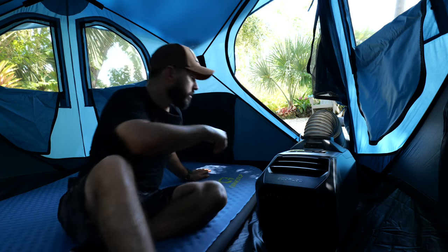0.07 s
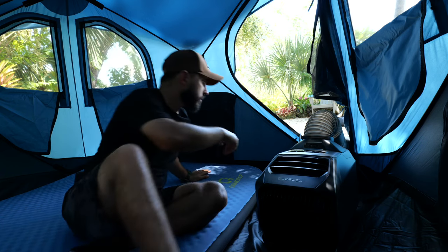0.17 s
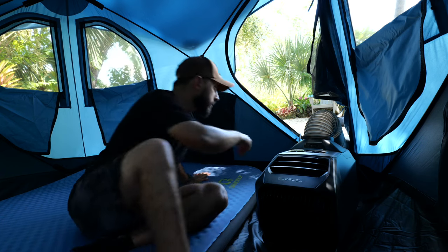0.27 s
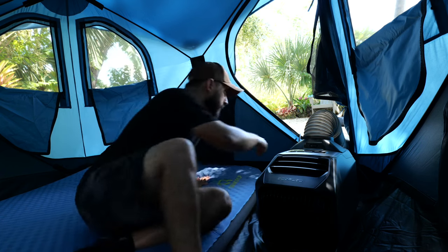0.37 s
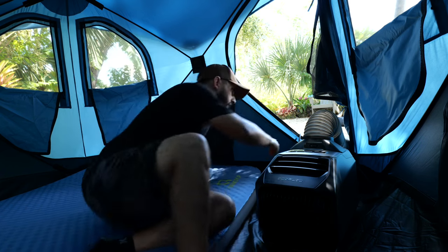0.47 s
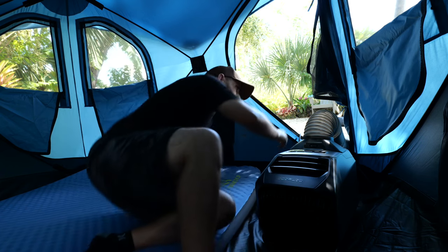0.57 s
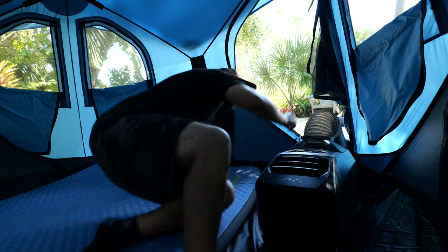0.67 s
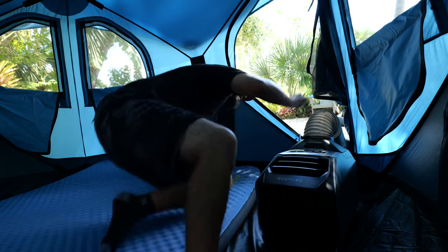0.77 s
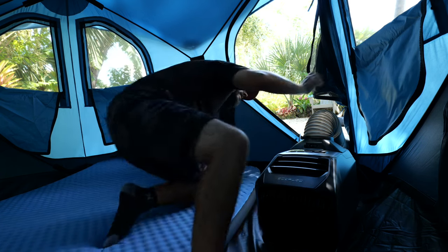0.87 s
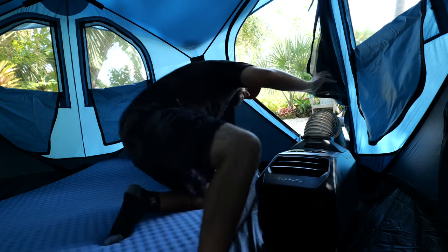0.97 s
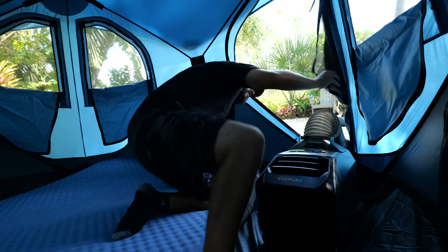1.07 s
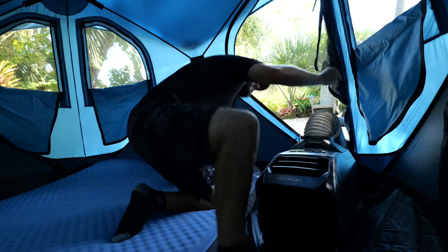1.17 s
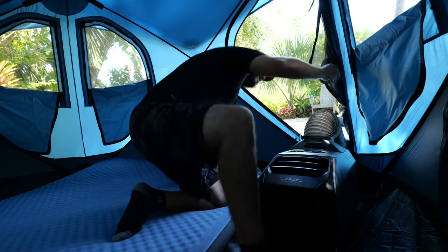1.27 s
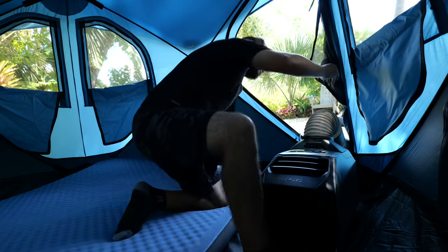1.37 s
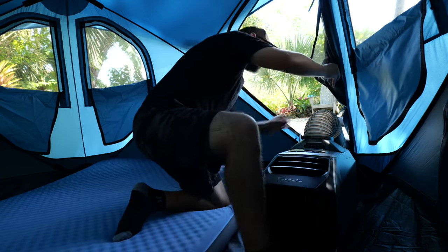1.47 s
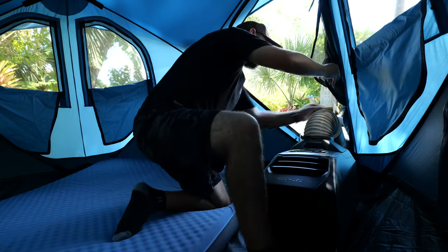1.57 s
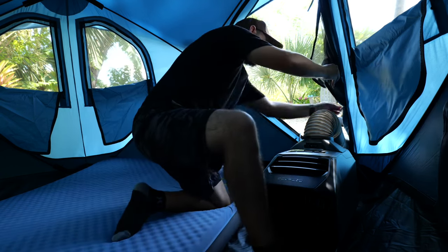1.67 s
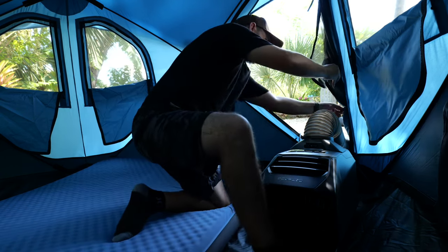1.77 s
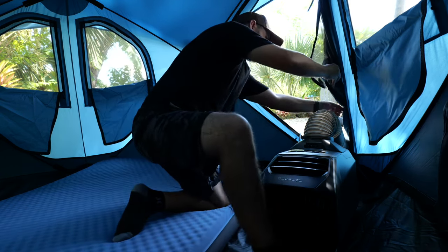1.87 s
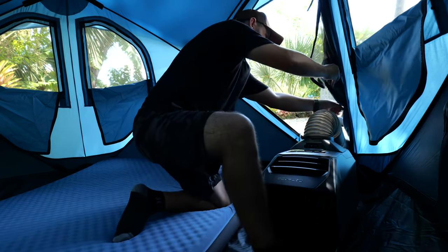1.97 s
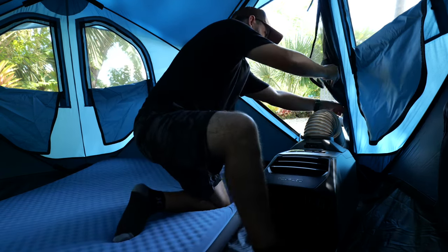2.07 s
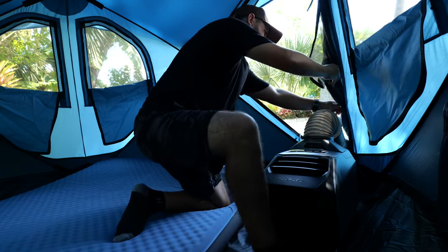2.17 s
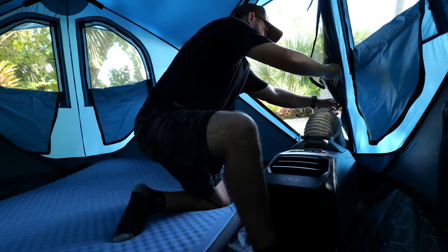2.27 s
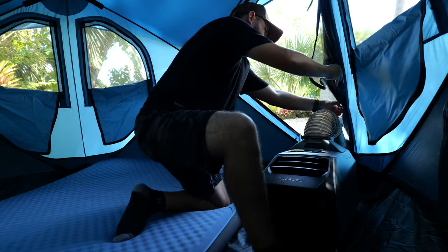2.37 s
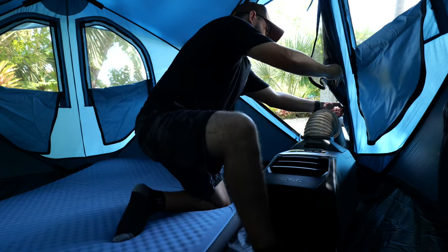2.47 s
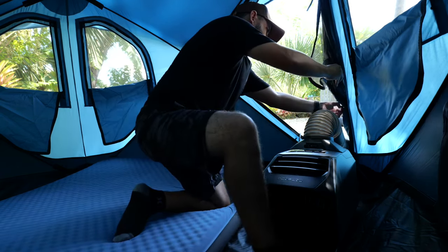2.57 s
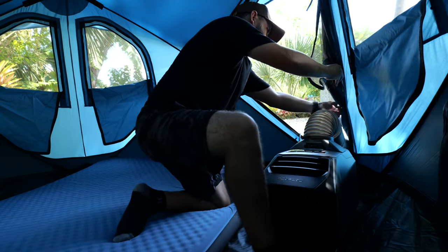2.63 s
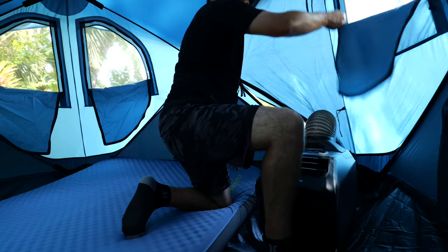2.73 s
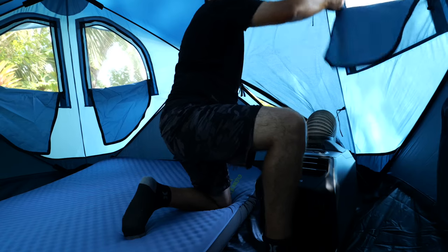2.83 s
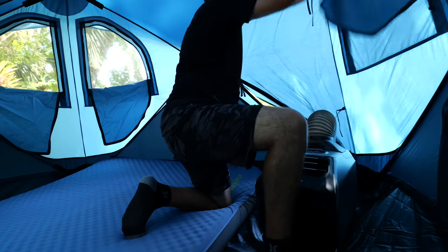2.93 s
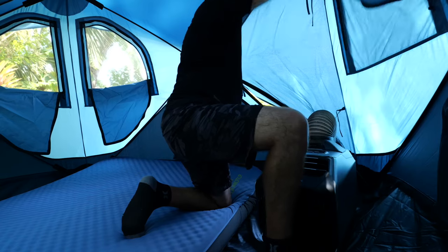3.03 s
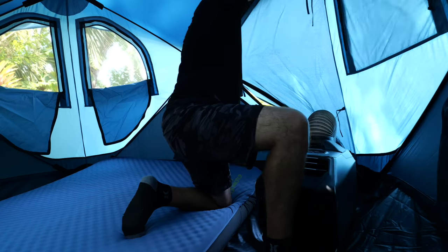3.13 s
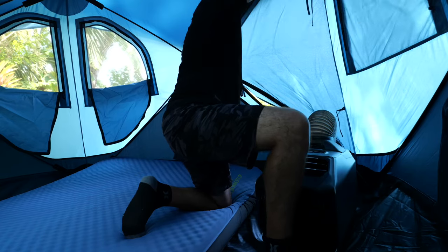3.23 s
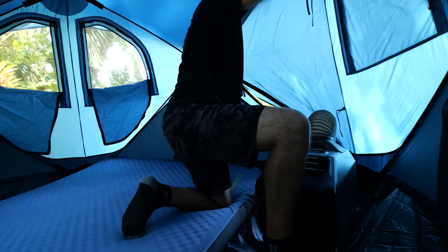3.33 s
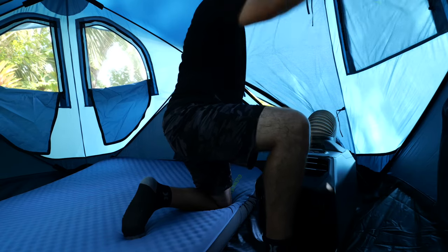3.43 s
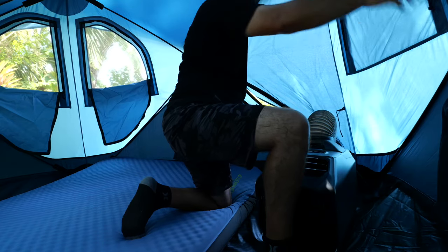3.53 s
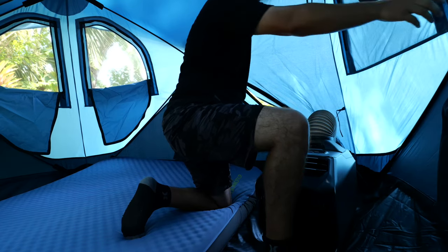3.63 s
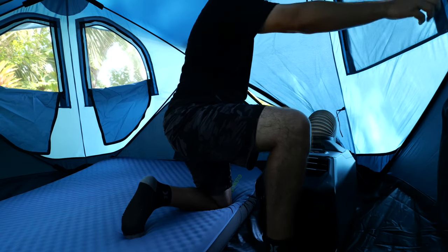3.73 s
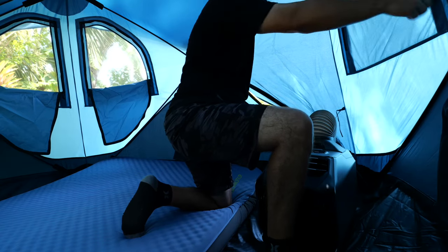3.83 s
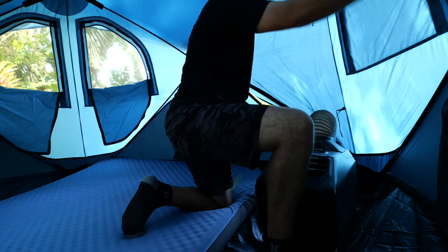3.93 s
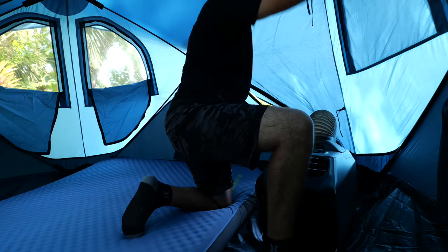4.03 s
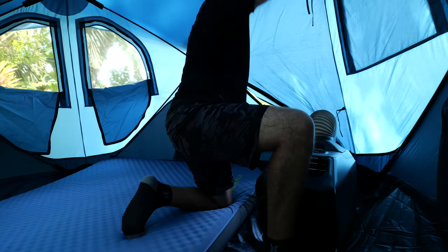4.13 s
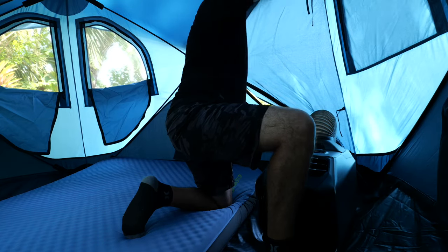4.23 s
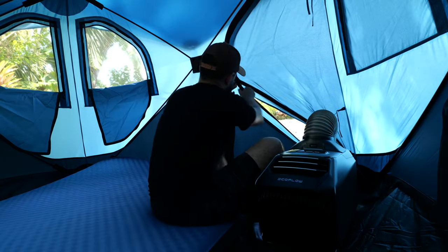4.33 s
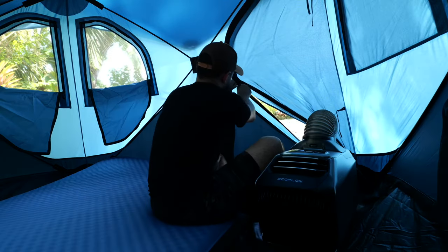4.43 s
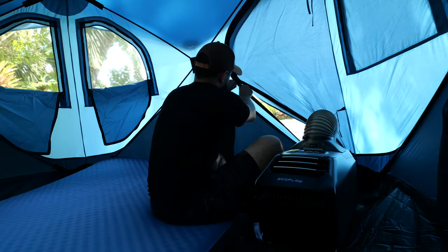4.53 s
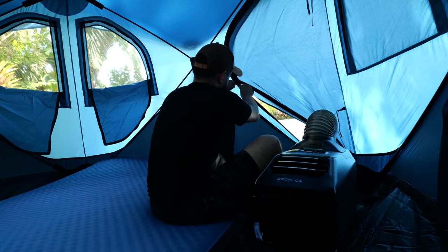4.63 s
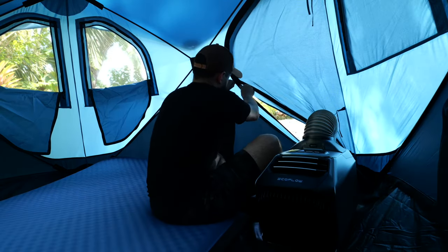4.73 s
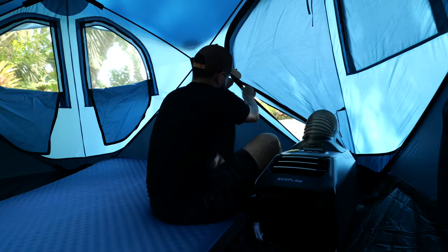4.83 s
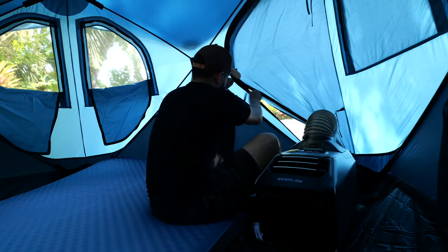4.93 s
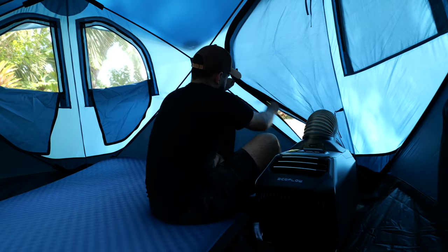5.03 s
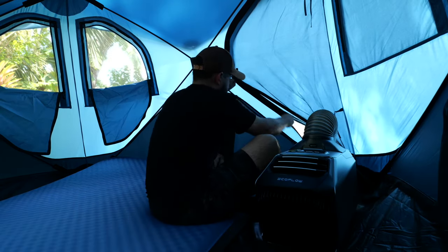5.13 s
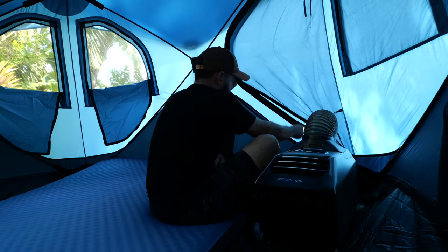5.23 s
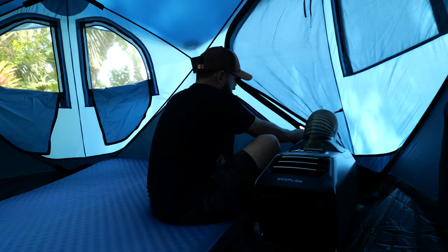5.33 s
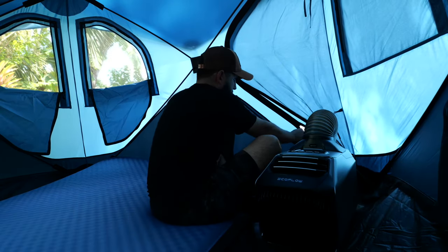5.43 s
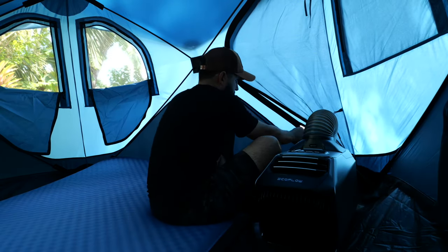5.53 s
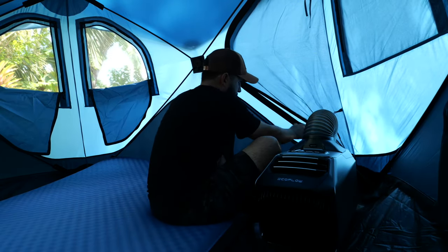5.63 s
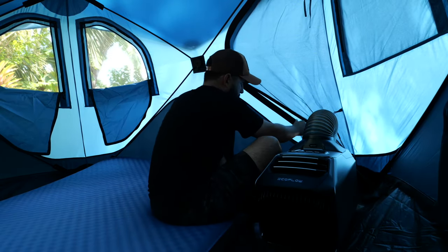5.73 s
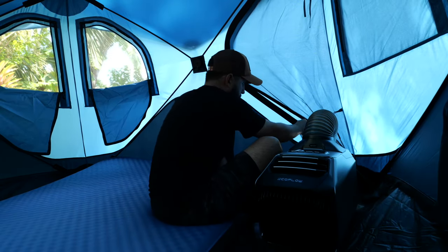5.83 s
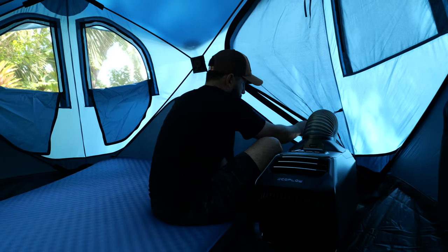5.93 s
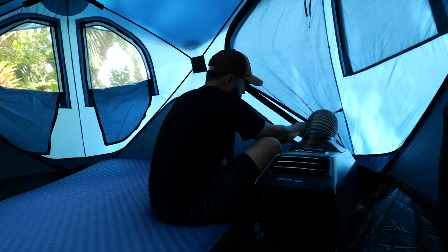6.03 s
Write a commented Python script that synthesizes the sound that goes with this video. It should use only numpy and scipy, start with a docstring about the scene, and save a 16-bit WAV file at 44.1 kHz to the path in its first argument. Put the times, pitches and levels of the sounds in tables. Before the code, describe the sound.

Inside a small nylon tent, clothes brush a foam mat and stiff fabric is grabbed with crisp crackles and sharp snaps. A short zip whirs upward in pitch, slack cloth flaps softly, and a second, higher zip buzzes past. After a tab jingle and fabric pops, a third zip clicks, rises, and falls. Crumpling follows. The microphone is close and dry, slightly overloaded on peaks.

```python
"""Zipping up a nylon tent

Inside a nylon tent someone shifts on a foam mat, lifts the window flaps and pulls three zippers shut.
Each slider clicks over the teeth when slow and sings at their rate when fast: gliding tones, rasp and hiss.
Filtered noise makes the cloth swish and crumple, short swings make it snap, decaying modes ring the pull tab.
One close microphone, which the loudest peaks overload, also hears faint air outside."""
import sys
import numpy as np
from scipy import signal
from scipy.fft import rfft, irfft, next_fast_len
from scipy.io import wavfile
from scipy.ndimage import uniform_filter1d, map_coordinates

SR = 44100
rng = np.random.default_rng(int(sys.argv[2]) if len(sys.argv) > 2 else 0)


def generate_wav(sig):
    """Save sig (samples, or channels by samples) to the path in sys.argv[1] as 16-bit PCM at SR."""
    pcm = np.round(np.clip(np.atleast_2d(sig).T, -1, 1) * 32767).astype(np.int16)
    wavfile.write(sys.argv[1], SR, pcm)


N = 268965
TIME = np.arange(N) / SR

# Slider strokes. Each row: time in seconds, teeth per second, effort in dB.
FLAP_UP = [(2.712, 453, -17.5), (2.754, 584, -6.5), (2.788, 485, -14.5), (2.812, 453, -12.5),
           (2.86, 463.7, -14.5), (2.896, 620, -6.5), (2.926, 714, -15.5), (2.948, 740.1, -11),
           (2.992, 968.8, -23), (3.054, 724.9, -17), (3.074, 571.8, -17)]
FLAP_ACROSS = [(3.892, 599, -10), (3.904, 659.7, -13), (3.93, 647, -10.5), (3.954, 742.9, -9),
               (3.992, 941, -19), (4.03, 995.6, -23), (4.072, 874.6, -16), (4.136, 1078, -16),
               (4.188, 949, -8), (4.208, 874, -18), (4.23, 958, -8), (4.264, 782, -8.5), (4.29, 638, -21)]
WINDOW_DOWN = [(4.83, 60.3, -8), (4.856, 86.2, -14), (4.94, 201.4, -8.5), (4.97, 334.7, -17),
               (5.004, 496.9, -13), (5.044, 655.5, -9), (5.074, 670.4, -16), (5.122, 559.5, -11),
               (5.176, 413.2, -16), (5.238, 452.4, -7.5), (5.27, 345.7, -15), (5.298, 251.4, -18),
               (5.335, 131.3, -23)]
# Wall and tighter-stretched roof panel shaken by the teeth. Each row: frequency in Hz, relative gain in dB.
WALL = [(40, -11.5), (130, -3), (300, 1), (450, 1), (800, 7), (1250, 5.5), (1700, -3.5), (2400, -11),
        (3000, -48), (6000, -104)]
ROOF = [(40, 1.5), (110, -19), (200, -9.5), (450, -11), (780, 3), (950, -5.5), (1250, 0.5), (1700, -10),
        (2400, -14.5), (3000, -37), (6000, -48)]
# Slider hiss, screened by cloth or in the open. Each row: frequency in Hz, relative gain in dB.
SCREENED = [(1500, -60), (2600, -5), (4500, 1), (5600, -13.5), (8000, -13.5), (11000, -26), (16000, -41)]
OPEN = [(1500, -54), (2600, -1.5), (4000, 2.5), (5000, -4), (7000, -1), (10000, -7.5), (12500, -14.5),
        (16000, -22)]
# How strongly the taut nylon sings. Each row: pitch in Hz, relative level in dB.
SINGING = [(60, -11), (130, 7), (200, 2), (300, -10), (420, -8.5), (600, -2.5), (900, -0.5), (1300, -2.5),
           (2000, -10)]
ZIP_ATTACK_S, ZIP_RELEASE_S = 0.0094, 0.0048
ODD_LOSS_DB = 3  # teeth come from the two rows in turn, which weakens the odd overtones
STEADYING = 1  # dB less roughness per dB of effort


def zipper(stroke, panel, hiss_colour, waver, rough, jerk_db, note_db, note_grows, octave_db,
           overtone_db, fall_db, rasp_db, rasp_grows, hiss_db, hiss_per_octave_db, hiss_db_per_s, puff_s):
    """The slider bumps over the teeth: a gliding note, a rasp of unequal teeth, a puff of hiss per tooth."""
    teeth, effort_db = curves(stroke)
    gate = envelope(stroke[0][0] + ZIP_ATTACK_S, stroke[-1][0], ZIP_ATTACK_S, ZIP_RELEASE_S)
    # effort brings out the note far more than the rasp
    push_db = effort_db - np.average(effort_db, weights=gate)
    # the hiss follows the speed and drifts along the stroke
    from_middle = np.clip(TIME - np.average(TIME, weights=gate), -.5, .5)
    speed_db = hiss_per_octave_db * np.log2(teeth / teeth.max())
    scrape_db = hiss_db + speed_db + hiss_db_per_s * from_middle
    turns = np.cumsum(teeth * (1 + waver * wobble(150))) / SR  # teeth passed so far
    # a firm pull runs evenly, a weak one stumbles
    uneven = rough * amp(-STEADYING * push_db)

    def jerks():
        return unit(amp(jerk_db * wobble(50)))

    # fundamental and octave trade strength as they glide through the resonances of the nylon
    first = amp(along(SINGING, teeth))
    octave = amp(along(SINGING, 2 * teeth) + octave_db)
    pair = first * jerks() * ragged(turns, uneven, 260)
    pair += octave * jerks() * ragged(2 * turns, 2 * uneven, 260)
    note = amp(note_db + note_grows * push_db) * pair / np.hypot(first, octave)

    # the high overtones follow the scrape and blur as they rise
    for k in range(3, 7):
        level_db = scrape_db + overtone_db - fall_db * (k - 5) - ODD_LOSS_DB * (k % 2)
        note += amp(level_db) * jerks() * ragged(k * turns, 1.36 * k * rough, 75 * k)

    # each tooth kicks the panel with its own strength, over a bed of irregular catches and friction
    tooth = np.diff(np.floor(turns), prepend=0) * np.sqrt(SR / teeth)
    strengths = 0.26 * rng.standard_normal(N) + 0.45 * wobble(300)
    kicks = tooth * strengths + .5 * grains(260, 1.9, 0.66)
    rasp = unit(colour(kicks, panel))

    # a puff has a fixed life: separate ticks when slow, one hiss when fast
    lives = 1 / (teeth * puff_s)
    even_power = np.sqrt(2 * lives / (1 - np.exp(-2 * lives)))
    puffs = np.exp(-lives * (turns % 1)) * even_power * amp(0.87 * wobble(160))
    friction = colour(puffs * grains(3000, 3.9, 0.06), hiss_colour)
    hiss = unit(patchy(friction, depth_db=3.5))
    return gate * (note + amp(rasp_db + rasp_grows * push_db) * rasp + amp(scrape_db) * hiss)


# The click of a single tooth. Each row: frequency in Hz, relative gain in dB.
CLICK = [(120, -23), (500, 19), (1100, -1.5), (2000, -27.5), (4000, -2), (9000, -25), (15000, -31)]


def slow_teeth(stroke, click_db, merge_hz, click_s):
    """While the slider creeps, each tooth catches and lets go with a click; at speed they merge and vanish."""
    teeth, effort_db = curves(stroke)
    moving = (TIME >= stroke[0][0]) & (TIME <= stroke[-1][0])
    turns = np.cumsum(teeth * moving) / SR
    since_tooth = (turns % 1) / teeth  # seconds
    clicks = np.exp(-since_tooth / click_s) * amp(3.0 * wobble(120)) * moving
    level = amp(effort_db + click_db) / (1 + (teeth / merge_hz) ** 4)
    return level * clicks * unit(colour(rng.standard_normal(N), CLICK))


# Heaving panels, then crumpling creases. Each row: frequency in Hz, relative gain in dB.
HEAVE = [(15, -44), (25, -24), (108, 3.5), (204, 0.5), (300, -6.5), (390, -23), (660, -120)]
CRUMPLE = [(120, -29.5), (200, -10), (418, 1), (459, -1.5), (578, 2.5), (726, -3), (1120, -4), (1950, -16),
           (2400, -16.5), (3120, -35.5), (5280, -120)]
# Swish of clothes on the mat, a gripped flap, a dragged hem, and the wall or slack cloth.
# Each row: frequency in Hz, relative gain in dB.
CLOTHES = [(1000, -13), (1700, -5.5), (2150, -9.5), (2720, -2), (2820, 0), (7210, -3.5), (13900, -20.5),
           (16000, -27)]
GRIP = [(470, -30), (800, 4.5), (873, -3.5), (1240, 1.5), (2000, -4), (3300, -1), (4930, -7.5),
        (12600, -24), (14800, -28), (16000, -56)]
HEM = [(1000, -33.5), (1700, -9.5), (1960, -9.5), (2130, 1.5), (2570, -0.5), (3100, -1.5), (3840, -4),
       (5600, -1), (7010, -7.5), (9920, -13), (14700, -25.5), (16000, -27)]
SWISH = [(820, -44), (1400, -2.5), (1810, -1.5), (2630, 2.5), (3650, 0), (7530, -7.5), (12900, -19.5),
         (15200, -25), (16000, -50)]


def cloth(name, weave_colour, crease_rate, crease_share, crisp_share, bright_db, sub_db, uneven_db):
    """Moving nylon: whole panels heave, creases buckle, and the weave swishes over itself."""
    heaving, crumpling, swishing = motion(name)
    rumble = colour(rng.standard_normal(N), HEAVE)
    heave = unit(colour(rumble, [(35, sub_db), (130, 0)]))
    creases = grains(crease_rate, 4.5, crease_share)
    crumple = unit(colour(creases, CRUMPLE))
    rubbing = grains(900, 0.76, crisp_share) + 0.53 * creases
    weave = patchy(colour(rubbing, weave_colour), depth_db=2.5)
    swish = unit(colour(weave, [(2500, 0), (14000, bright_db)]))
    grip = amp(1.2 * wobble(70) + uneven_db * wobble(22))
    return grip * (heaving * heave + crumpling * crumple + swishing * swish)


# Pushes and pulls on the cloth. Each row: start in seconds, length in seconds, which cloth,
# heave level in dB, crumple level in dB, swish level in dB.
MOVES = [(0.057, 0.043, "clothes", -58, -63, -40), (0.1, 0.12, "clothes", -48, -62, -49),
         (0.288, 0.026, "clothes", -28.5, -25.5, -32), (0.364, .32, "clothes", -34, -29.5, -36.5),
         (0.678, 0.22, "clothes", -41.5, -41, -30), (0.921, 0.038, "clothes", -30, -28, -36),
         (1.015, 0.027, "grip", -37, -31.5, -26), (1.067, 0.05, "grip", -42, -29, -20),
         (1.176, 0.1, "grip", -37, -26, -23.5), (1.348, 0.051, "grip", -42, -37, -31),
         (1.44, 0.21, "grip", -40.5, -46, -39.5), (1.591, 0.66, "hem", -38, -32, -32.5),
         (2.24, .03, "hem", -34, -27, -30), (2.344, 0.21, "hem", -35.5, -31, -31),
         (2.635, 0.0083, "hem", -36, -25.5, -25), (2.919, 0.27, "slack", -27.5, -33.5, -49.5),
         (3.262, 0.68, "slack", -29.5, -41, -59), (3.468, 0.096, "slack", -19.5, -28, -52),
         (3.646, 0.17, "slack", -28.5, -35.5, -53), (3.916, 0.35, "slack", -30.5, -48, -64),
         (4.358, 0.32, "wall", -33.5, -32.5, -35), (4.424, 0.066, "wall", -50, -28, -29),
         (4.769, .03, "wall", -21.5, -33, -33), (5.347, 0.73, "wall", -31.5, -35.5, -37.5),
         (5.677, 0.036, "wall", -24, -27.5, -29.5), (5.983, 0.017, "wall", -29, -25.5, -24)]
MOVE_ATTACK_S, MOVE_RELEASE_S = 0.037, 0.039


def motion(*cloths):
    """Strength of heaving, crumpling and swishing; overlapping moves add their power."""
    power = np.zeros((3, N))
    for s, length, name, *levels in MOVES:
        if name in cloths:
            shape = envelope(s, s + length, MOVE_ATTACK_S, MOVE_RELEASE_S)
            power += np.outer(amp(levels) ** 2, shape ** 2)
    return np.sqrt(power)


# The cloth snaps taut or is bumped. Each row: start in seconds, swing level in dB,
# nominal panel pitch in Hz, crack level in dB relative to the swing, before a common trim.
SNAPS = [(0.530, -11, 330, -23), (0.595, -14, 570, -16), (0.662, -10, 576, -13), (1.078, -1.5, 2870, -28),
         (1.245, -9.5, 141, -34), (1.269, -4.5, 457, -5.5), (1.314, -1, 1240, -22), (2.96, 2.5, 1160, -22),
         (3.1, -17, 1300, -22), (3.146, -8.5, 1240, -14), (3.194, -15.5, 1030, -34), (3.456, -3, 390, -48),
         (3.532, -6, 397, -34), (3.557, -19, 264, -8), (3.574, -9, 304, -21), (3.918, 0.5, 205, -46),
         (4.498, -8.5, 930, 5.5), (4.579, -6, 1120, 0.5), (4.656, -9, 850, -17), (4.664, 4.5, 867, -5.5),
         (4.796, -2, 223, -22), (4.801, 4, 736, -13), (4.827, -11, 366, -19), (4.876, 0.5, 636, -22),
         (5.204, -11.5, 195, -9), (5.385, -14, 260, 6), (5.422, -14.5, 1770, 5), (5.661, -2, 505, -10),
         (5.783, -4.5, 495, -6.5), (5.836, -8, 476, 0), (5.913, -10.5, 600, 7.5), (5.967, -9, 760, -5),
         (5.969, -1, 2927, -13), (6.016, -19, 706, 12), (6.055, -9, 1140, 2.5)]


def snaps(cycles, crack_t60, crack_rise_s, crack_db, thud_db):
    """A panel pulled taut swings for a cycle or two, with a crack on top and a slower thud below."""
    out, cracks = np.zeros(N), np.zeros(N)
    t = np.arange(SR // 12) / SR
    crack_shape = (1 - np.exp(-t / crack_rise_s)) * amp(-60 * t / crack_t60)
    for s, db, hz, rel_db in SNAPS + flicks():
        age = t * (hz + 150) / cycles
        swing = 0
        for ratio, size in [(.6, 0.24), (1, 0.75), (1.6, 0.12)]:
            cycle = ratio * (hz * t * rng.uniform(0.78, 1.247) - .7)
            swing = swing + size * np.sin(2 * np.pi * cycle)
        thud = amp(thud_db - 60 * t / 0.095) * np.sin(2 * np.pi * rng.uniform(107, 260) * t)
        add(out, s, amp(db) * (swing * age * np.exp(1 - age) + thud))
        add(cracks, s, amp(db + rel_db + crack_db) * crack_shape * rng.standard_normal(len(t)))
    out += colour(cracks, [(200, -13), (1200, 5.5), (4000, 2), (9000, -1), (15000, -20)])
    # a high-pass keeps the snaps free of deep rumble
    return signal.sosfilt(signal.butter(2, 75, "high", fs=SR, output="sos"), out)


# small snaps: rate, mean level over the crumpling, middle pitch, crack relative to the swing before the trim
FLICKS_PER_S, FLICK_DB, FLICK_HZ, FLICK_CRACK_DB = 7, 9, 605, 0.5


def flicks():
    """Small snaps at random moments, their level following the crumpling of all but the slack cloth."""
    _, crumpling, _ = motion("clothes", "grip", "hem", "wall")
    rows = []
    for when, size, pitch in rng.random((round(FLICKS_PER_S * N / SR), 3)):
        crumple_db = 20 * np.log10(crumpling[int(when * N)] + 1e-6)
        db = crumple_db + FLICK_DB + 6 * (size - .5)
        hz = FLICK_HZ * 2 ** (3 * (pitch - .5))
        rows.append((when * N / SR, db, hz, FLICK_CRACK_DB))
    return rows


# The pull tab rattles on the slider. Each row: start in seconds, length in seconds, relative level in dB.
JINGLES = [(4.461, .005, -19), (4.481, .025, -4), (4.798, .005, -6.5), (4.831, .1, -1.5),
           (5.305, .005, -16), (5.385, .005, -22)]
# Modes of the metal tab. Each row: frequency in Hz, mean relative level in dB, 60 dB decay time in seconds.
TAB = [(4223, -0.5, 0.063), (4340, -5.5, 0.12), (5460, -32, 0.091), (6854, -11, 0.077), (7540, -12, .05),
       (10225, 0.5, .11), (14100, -16, .06), (14020, -13, 0.08)]
RATTLE_PER_S, RATTLE_QUICKENS_PER_S2 = 55, 500
RATTLE_FADE_DB_PER_S, REBOUND_LOSS_DB = 68, 5


def pull_tab():
    """Each rattle quickens and fades; every strike rings the tab at new strengths, blurred by its loose hinge."""
    out, t = np.zeros(N), np.arange(SR // 5) / SR

    def chatter():
        return .008 * np.cumsum(rng.standard_normal(len(t))) + rng.random()  # phase drift in cycles

    beats = np.floor(RATTLE_PER_S * t + RATTLE_QUICKENS_PER_S2 * t ** 2 / 2)
    strikes = t[np.diff(beats, prepend=-1) > 0]
    for s, length, db in JINGLES:
        for age in strikes[strikes <= length]:
            ring = 0
            for hz, level, t60 in TAB:
                decay = amp(level + rng.normal(0, 1.9) - 60 * t / t60)
                ring = ring + decay * np.sin(2 * np.pi * (hz * t + chatter()))
            tick = amp(-5.0 - 60 * t / 0.037) * rng.standard_normal(len(t))
            fade_db = RATTLE_FADE_DB_PER_S * age + REBOUND_LOSS_DB * (age > 0)
            add(out, s + age, amp(db - 7 + rng.normal(0, 2) - fade_db) * (ring + tick))
    return out


# Nylon sticks and slips under the fingers. Each row: centre in seconds, length in seconds,
# nominal pitch in Hz, level in dB, roughness from 0 to 1.
SQUEAKS = [(0.842, 0.057, 2700, -31.5, 0), (1.76, .06, 3050, -32.5, 1), (3.731, 0.043, 1000, -26.5, 0.9),
           (3.753, 0.018, 720, -21.5, 0.7)]


def squeaks():
    """Each short rub speeds up and slows again, so its pitch arches."""
    out = np.zeros(N)
    for s, length, hz, db, roughness in SQUEAKS:
        arch = np.exp(-(2 * (TIME - s) / length) ** 2)
        turns = np.cumsum(hz * (.82 + 0.15 * arch)) / SR
        out += amp(db) * arch * ragged(turns, roughness, 390)
    return out


def tent(x, wet_db, t60):
    """Thin walls return only a weak, short answer."""
    t = np.arange(SR // 6) / SR
    tail = rng.standard_normal(len(t)) * amp(-60 * t / t60) * (t > .003)
    return x + amp(wet_db) * signal.fftconvolve(x, tail / np.linalg.norm(tail))[:N]


# Air heard through the walls. Each row: frequency in Hz, relative gain in dB.
AIR = [(15, -39), (25, -19.5), (114, 2.5), (190, -13.5), (416, -15.5), (503, -12.5), (641, -17.5),
       (911, -15.5), (2110, -30.5), (2840, -49), (5430, -40), (14800, -45), (16000, -51)]


def outdoors():
    """Faint air through the walls as filtered noise, with a thin, barely audible whine."""
    air = amp(-39.5) * unit(colour(rng.standard_normal(N), AIR))
    return air + amp(-68.0) * ragged(5400 * TIME, 0.28, 160)


def ragged(turns, roughness, rate):
    """A tone of rms near 1; uneven slips turn a share of it into a fuzzy band around the pitch."""
    share = np.clip(roughness, 0, 1)
    swing = np.sqrt(2 * (1 - share)) + np.sqrt(share) * (wobble(rate) + 1j * wobble(rate))
    return np.real(swing * np.exp(2j * np.pi * (turns + rng.random())))


def grains(rate, spread_db, share):
    """Random tiny impulses of uneven size, rate a second, mixed with smooth friction noise."""
    sizes = amp(spread_db * np.clip(rng.standard_normal(N), -2, 2)) * rng.choice([-1, 1], N)
    impulses = unit(sizes * (rng.random(N) < rate / SR))
    share = np.clip(share, 0, 1)
    return np.sqrt(share) * impulses + np.sqrt(1 - share) * rng.standard_normal(N)


def patchy(x, depth_db):
    """Folds form and flatten, so the cloth's resonances keep shifting."""
    z = signal.stft(x, nperseg=512)[2]
    field = uniform_filter1d(rng.standard_normal(z.shape), size=5, axis=0)  # smooth over frequency
    field = uniform_filter1d(field, size=6, axis=1)  # smooth over time
    return signal.istft(z * amp(depth_db * unit(field)), nperseg=512)[1][:N]


def colour(x, points):
    """Causal minimum-phase filter with the gain of the (Hz, dB) points."""
    size = next_fast_len(N + 8192)
    gain = amp(along(points, np.fft.rfftfreq(size, 1 / SR)))
    # folding the cepstrum forward in time makes the filter causal
    cepstrum = irfft(np.log(np.maximum(gain, 1e-6)), size)
    cepstrum[1:size // 2] *= 2
    cepstrum[size // 2 + 1:] = 0
    return irfft(rfft(x, size) * np.exp(rfft(cepstrum)), size)[:N]


def along(points, hz):
    """Read (Hz, dB) points on a log axis."""
    f, db = np.transpose(points)
    return np.interp(np.log(hz + 1), np.log(f), db)


def envelope(start, end, attack_s, release_s):
    """Swells up to the start, holds, and fades after the end."""
    before = np.maximum(start - TIME, 0) / attack_s
    after = np.maximum(TIME - end, 0) / release_s
    return np.exp(-before ** 2 - after ** 2)


def curves(rows):
    """One value per sample for each column after the time."""
    s, *cols = np.transpose(rows)
    return [np.interp(TIME, s, c) for c in cols]


def wobble(rate):
    """A smooth random curve, rate knots a second."""
    return map_coordinates(rng.standard_normal(int(N * rate / SR) + 4), [TIME * rate])


def amp(db):
    """Decibels to gain."""
    return 10 ** (np.asarray(db) / 20)


def unit(x):
    """Scale to rms 1."""
    return x / np.sqrt(np.mean(x ** 2) + 1e-20)


def add(track, s, sound):
    """Mix a sound in at time s."""
    part = track[round(s * SR):][:len(sound)]
    part += sound[:len(part)]


def scene():
    """Three zips among the handling of the cloth, over faint outdoor air; both channels alike."""
    zips = zipper(FLAP_UP, WALL, SCREENED, waver=0.043, rough=0.25, jerk_db=3.0,
                  note_db=-16, note_grows=1.4, octave_db=-11.0, overtone_db=-16, fall_db=4,
                  rasp_db=-16, rasp_grows=.15,
                  hiss_db=-37.5, hiss_per_octave_db=4.5, hiss_db_per_s=-10.5, puff_s=0.0015)
    zips += zipper(FLAP_ACROSS, ROOF, SCREENED, waver=0.019, rough=0.15, jerk_db=2,
                   note_db=-16.5, note_grows=1.49, octave_db=-8, overtone_db=-11, fall_db=5.5,
                   rasp_db=-20.0, rasp_grows=.27,
                   hiss_db=-36, hiss_per_octave_db=10.5, hiss_db_per_s=12, puff_s=0.0012)
    zips += zipper(WINDOW_DOWN, WALL, OPEN, waver=0.012, rough=0.11, jerk_db=2.4,
                   note_db=-13.5, note_grows=1.0, octave_db=-3, overtone_db=-9, fall_db=2.0,
                   rasp_db=-24, rasp_grows=0.31,
                   hiss_db=-19.0, hiss_per_octave_db=6, hiss_db_per_s=17, puff_s=0.0073)
    zips += slow_teeth(WINDOW_DOWN, click_db=0.5, merge_hz=189, click_s=0.0032)
    # a high-pass keeps the zips free of deep rumble
    zips = signal.sosfilt(signal.butter(3, 55, "high", fs=SR, output="sos"), zips)

    rustle = cloth("clothes", CLOTHES, crease_rate=230, crease_share=0.47, crisp_share=0.16,
                   bright_db=-5.5, sub_db=-26, uneven_db=1.3)
    rustle += cloth("grip", GRIP, crease_rate=250, crease_share=0.7, crisp_share=0.44,
                    bright_db=4.5, sub_db=-14.5, uneven_db=-0.3)
    rustle += cloth("hem", HEM, crease_rate=300, crease_share=0.4, crisp_share=0.61,
                    bright_db=3.0, sub_db=-6, uneven_db=0.0)
    rustle += cloth("slack", SWISH, crease_rate=200, crease_share=0.82, crisp_share=0.58,
                    bright_db=-13, sub_db=18.5, uneven_db=0.84)
    rustle += cloth("wall", SWISH, crease_rate=170, crease_share=0.57, crisp_share=0.45,
                    bright_db=11, sub_db=-2, uneven_db=3.2)

    hits = snaps(cycles=0.85, crack_t60=0.015, crack_rise_s=0.0019, crack_db=-1, thud_db=-22.5)
    hits += pull_tab()
    mono = tent(hits, wet_db=-8.5, t60=0.056) + zips + rustle + squeaks() + outdoors()
    return np.array([mono, mono])


TOP_HZ = 15800


def record(dry):
    """The loudest peaks are rounded off; nothing is kept above the band limit."""
    size = next_fast_len(N + 8192)
    rounded = dry / (1 + np.abs(dry / 1.02) ** 6) ** (1 / 6)
    in_band = np.fft.rfftfreq(size, 1 / SR) < TOP_HZ
    return irfft(rfft(rounded, size) * in_band, size)[:, :N]


dry = scene()
out = record(dry)
generate_wav(out)
```